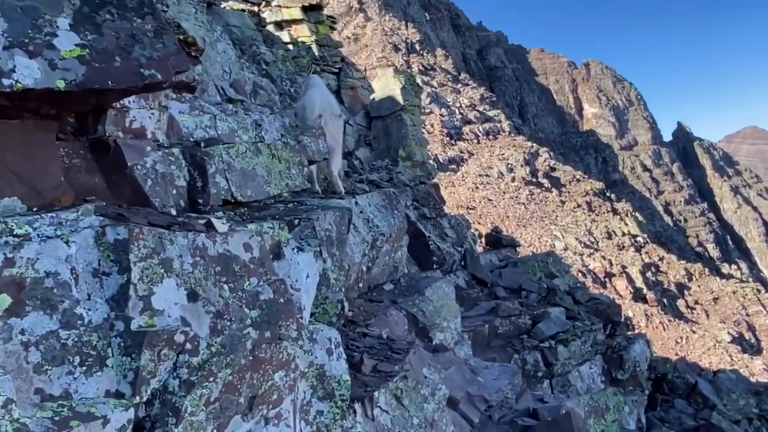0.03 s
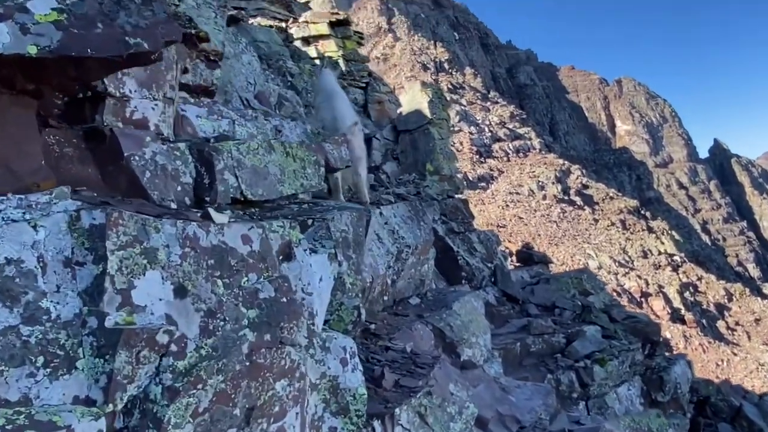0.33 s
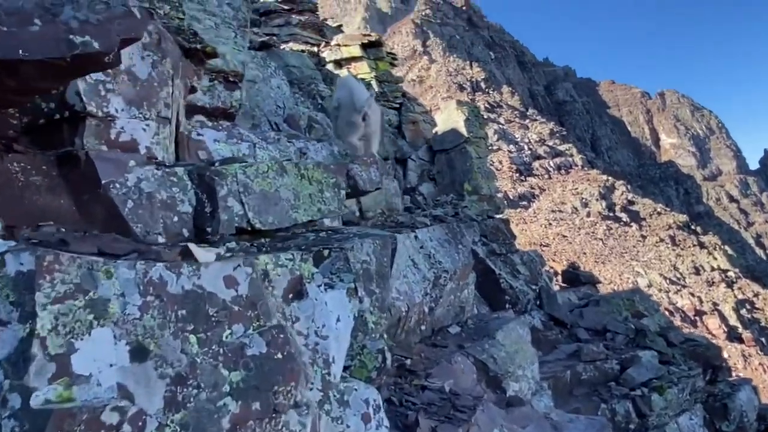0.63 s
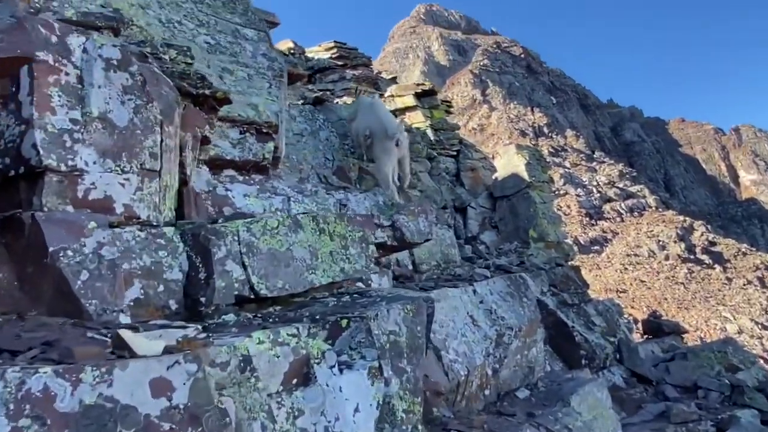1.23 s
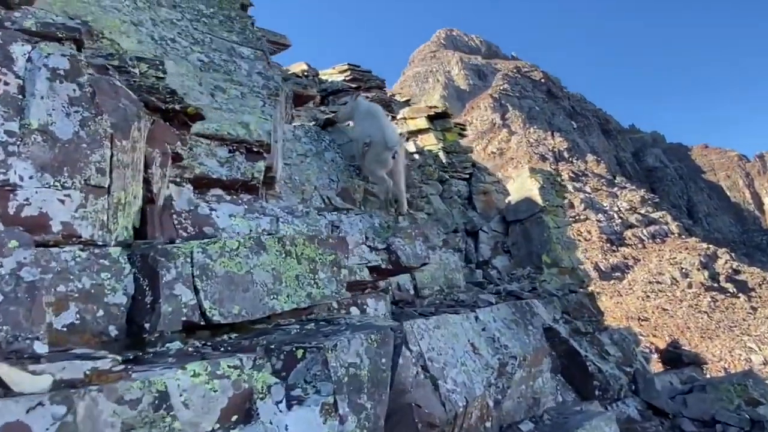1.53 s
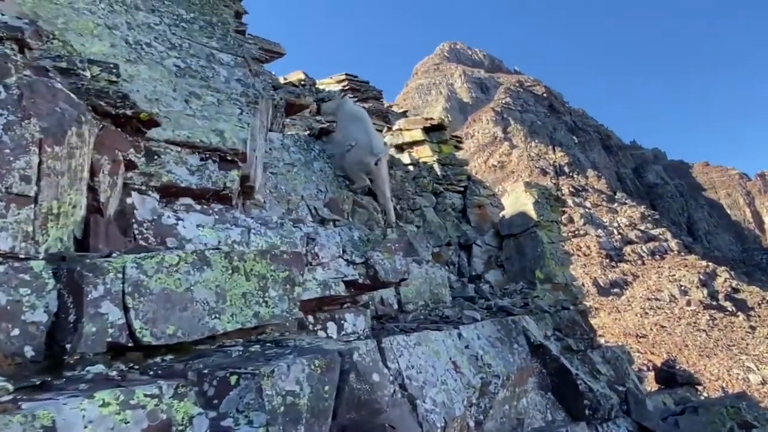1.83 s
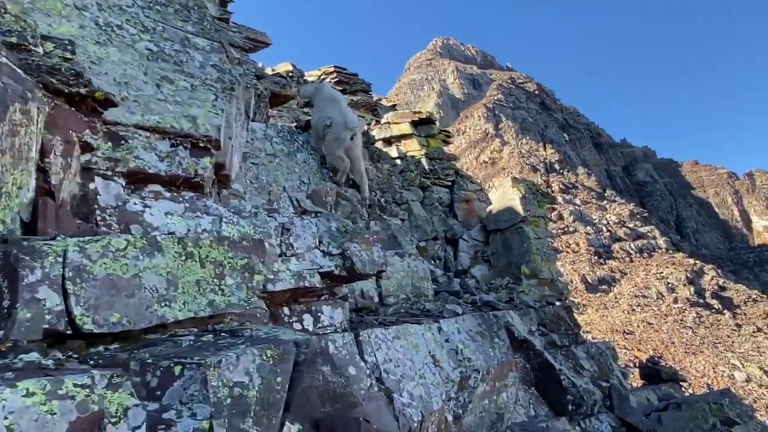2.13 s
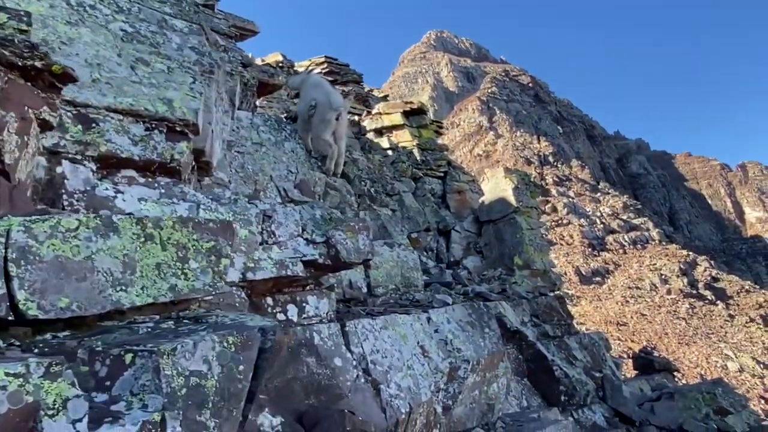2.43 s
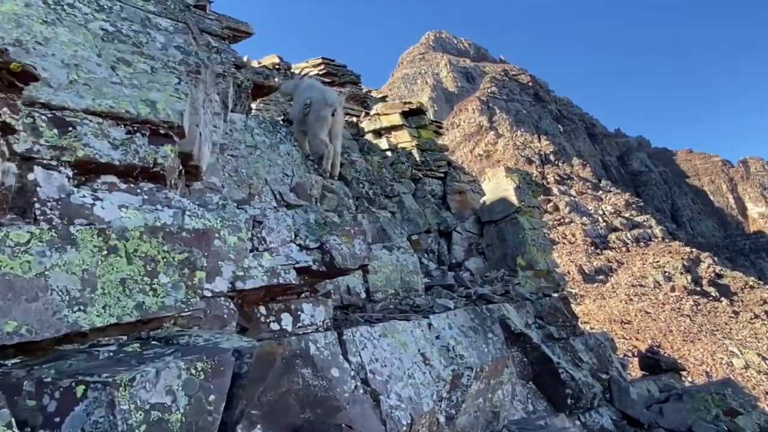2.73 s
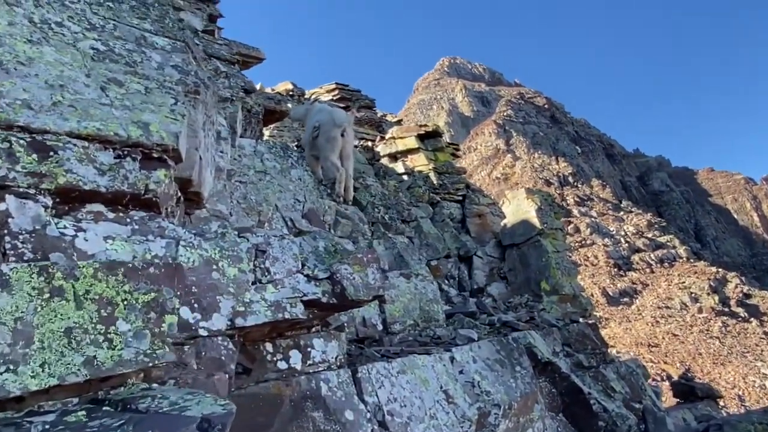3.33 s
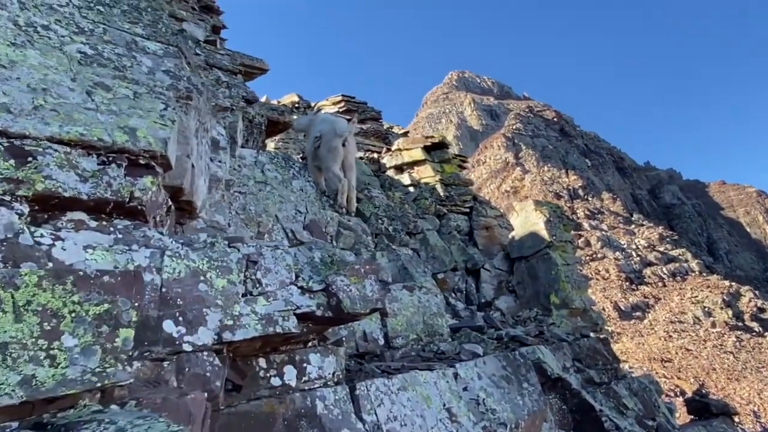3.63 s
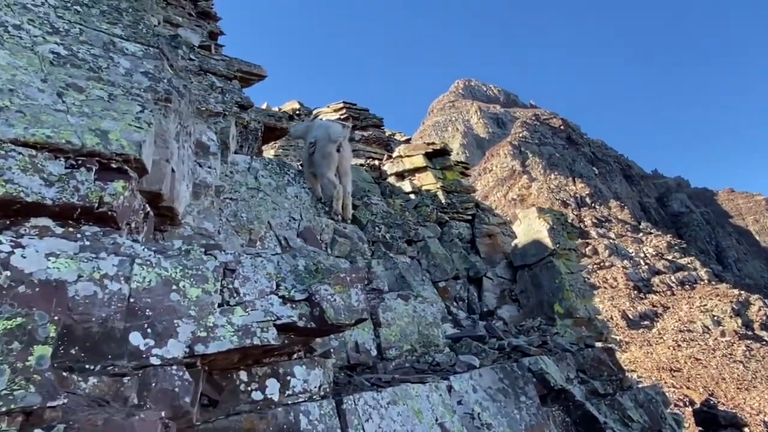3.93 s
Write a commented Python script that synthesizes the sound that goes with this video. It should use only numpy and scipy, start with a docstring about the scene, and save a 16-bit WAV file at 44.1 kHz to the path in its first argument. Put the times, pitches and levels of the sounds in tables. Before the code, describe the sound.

Gusty wind buffets the microphone over a few footsteps clacking on loose rock.

```python
"""Footsteps on a windy mountain ledge

Loose slabs clack underfoot, small chips tick and soles scuff over grit. The rock wall beside
the path answers with a short echo. Gusts hit the microphone with a low rumble and a stream of
eddies: small swirls of air, each a short falling flutter, the strongest heard as separate puffs.
Behind it all is the faint hiss of open air."""
import sys
import numpy as np
from scipy import signal
from scipy.fft import rfft, irfft, next_fast_len
from scipy.io import wavfile
from scipy.ndimage import map_coordinates

SR = 44100
rng = np.random.default_rng(int(sys.argv[2]) if len(sys.argv) > 2 else 0)


def digitize_waveform(pressure):
    """Quantize a signal to 16-bit integers and store it at the path in sys.argv[1].

    Rows of a 2-D input are taken as channels; values are limited to [-1, 1].
    """
    field = np.atleast_2d(pressure).T
    bounded = np.clip(field, -1, 1)
    quanta = np.round(bounded * 32767).astype(np.int16)
    wavfile.write(sys.argv[1], SR, quanta)


N = 176400  # 4 seconds
STEP_ALIKE = 0.24  # how alike the steps are left and right, from 0 (unrelated) to 1 (the same)

# Wind strength at the microphone. Each row: time in seconds, level in dB.
GUST_LEVEL = [(0.0, -33.5), (0.14, -32), (0.2, -43.5), (0.29, -48), (0.33, -34.5), (0.35, -50),
              (0.4, -40.5), (0.45, -58.5), (0.48, -37), (0.52, -53.5), (0.61, -43), (0.65, -71), (0.7, -49),
              (0.72, -67), (0.74, -41.5), (0.78, -46.0), (0.84, -35), (0.88, -42.0), (1.0, -43.5),
              (1.05, -32), (1.08, -37.5), (1.16, -32), (1.21, -34), (1.32, -35.5), (1.34, -45.5),
              (1.42, -29.5), (1.48, -34), (1.95, -28.5), (2.16, -35), (2.19, -32.5), (2.21, -30.5),
              (2.28, -35), (2.31, -36.5), (2.35, -27), (2.39, -39), (2.46, -31.5), (2.49, -46.5),
              (2.55, -31), (2.59, -45.5), (2.63, -22), (2.66, -36.5), (2.69, -53), (2.72, -63), (2.74, -34),
              (2.92, -26.5), (2.99, -32.5), (3.01, -29), (3.32, -33), (3.34, -40), (3.39, -31.0),
              (3.41, -39), (3.51, -31.5), (3.59, -66), (3.61, -42.0), (3.7, -49.5), (3.72, -44.5),
              (3.76, -63.5), (3.78, -40.5), (3.81, -57.5), (3.88, -39.5), (3.91, -74), (3.99, -64)]


def amp(db):
    """Turn decibels into a number to multiply a sound by."""
    return 10 ** (np.asarray(db) / 20)


def unit(x):
    """Scale a signal so its average strength (rms) is 1."""
    return x / np.sqrt(np.mean(x ** 2) + 1e-20)


def along(points, hz):
    """Read between (Hz, value) points, giving each octave equal room."""
    freqs, values = np.transpose(points)
    return np.interp(np.log(hz + 1), np.log(freqs + 1), values)


def curve(rows):
    """Join (seconds, value) rows with straight lines, one value per sample."""
    return np.interp(np.arange(N) / SR, *np.transpose(rows))


def wobble(per_s, size=N):
    """A smooth curve through per_s random values a second."""
    return map_coordinates(rng.standard_normal(8192), [np.arange(size) * per_s / SR], mode="wrap")


def filtered(x, response):
    """Multiply each frequency in x by response(hz)."""
    n = x.shape[-1]
    padded = next_fast_len(n + 4096)
    return irfft(rfft(x, padded) * response(np.fft.rfftfreq(padded, 1 / SR)), padded)[..., :n]


def pan(db):
    """Gains that turn the left side up by db and the right side down as much."""
    return amp(np.array([[db], [-db]]))


def noise(spectrum, alike, tilt_db=0, size=N):
    """Stereo noise shaped by a spectrum, gaining tilt_db for each octave above 500 Hz."""
    def colour(hz):
        width = np.arccos(np.clip(along(alike, hz), -1, 1)) / 2
        octaves = np.log2(np.maximum(hz, 500) / 500)
        return amp(along(spectrum, hz) + tilt_db * octaves) * [np.cos(width), np.sin(width)]
    mid, side = filtered(rng.standard_normal((2, size)), colour)
    return unit(np.array([mid + side, mid - side]))


def add(out, start, x):
    """Mix x into out, beginning at start seconds."""
    i = int(np.clip(round(start * SR), 0, N - 1))
    out[:, i:i + x.shape[-1]] += x[..., :N - i]


def wind():
    """Gusts hit the microphone: a deep rumble, lumpy buffeting and a quicker, higher flutter."""
    # How loud the rumble and flutter are. Each row: time in seconds, level in dB.
    rumble_level = [(0.0, -29), (0.18, -35), (0.2, -44), (0.45, -31.0), (0.52, -49.5), (0.62, -30.5),
                    (0.65, -50), (0.76, -38.5), (0.78, -49.5), (0.86, -40.5), (1.05, -39.5), (1.13, -31),
                    (1.35, -36), (1.57, -26.5), (1.6, -34.0), (1.72, -26.5), (1.97, -37), (2.06, -31),
                    (2.16, -35), (2.18, -37), (2.34, -28), (2.39, -41), (2.42, -28.5), (2.49, -32.5),
                    (2.58, -29.5), (2.71, -40.5), (2.79, -25.5), (2.82, -35), (2.86, -28.5), (3.06, -29.5),
                    (3.1, -25.5), (3.15, -33.5), (3.22, -22.5), (3.25, -36.5), (3.49, -27), (3.52, -37),
                    (3.83, -38.5), (3.87, -31.5), (3.92, -47), (3.99, -45)]
    flutter_level = [(0.0, -34), (0.14, -36.5), (0.17, -64), (0.33, -44), (0.45, -60), (0.48, -55.5),
                     (0.52, -70), (0.61, -50.0), (0.63, -68.5), (0.77, -57.5), (0.78, -66.5), (0.83, -48),
                     (0.88, -49), (0.92, -55), (0.94, -57.5), (1.2, -32.5), (1.24, -54), (1.28, -55),
                     (1.33, -73.5), (1.42, -39), (1.48, -45), (1.54, -32), (1.6, -41), (1.64, -30),
                     (1.69, -43.0), (1.83, -28), (1.84, -46), (1.88, -30), (1.97, -46.5), (2.07, -38.5),
                     (2.11, -52), (2.13, -54), (2.15, -68), (2.29, -33), (2.52, -61), (2.57, -38),
                     (2.6, -61), (2.62, -30), (2.65, -28.5), (2.67, -69), (2.72, -90.5), (2.74, -40.5),
                     (3.01, -32.5), (3.21, -35.5), (3.29, -39.5), (3.31, -40.5), (3.41, -57.5), (3.47, -36),
                     (3.55, -74), (3.64, -64), (3.76, -83), (3.78, -61.5), (3.82, -87), (3.87, -49),
                     (3.9, -82), (3.99, -76)]
    # The tone of each layer. Each row: frequency in Hz, level in dB.
    rumble_tone = [(18, -28.5), (30, -10.5), (38, -8), (50, 1.5), (68, 2.5), (105, -0.5), (160, -6),
                   (260, -37.5), (500, -78), (1200, -120)]
    buffet_tone = [(50, -20.5), (110, -3), (170, -0.5), (310, -3), (450, -8.5), (650, -32), (1000, -46),
                   (2000, -85.5), (4000, -120)]
    flutter_tone = [(200, -23), (400, -0.5), (600, -1), (850, -14), (1200, -29), (1550, -43), (2100, -58.5),
                    (4000, -84.5), (7000, -120)]
    # How alike the wind is left and right. Each row: frequency in Hz, likeness from 0 to 1.
    alike = [(50, 0.86), (250, 0.76), (600, 0), (1500, 1)]
    rumble = amp(curve(rumble_level)) * noise(rumble_tone, alike)
    lumps = amp(4 * wobble(per_s=110))
    buffet = amp(curve(GUST_LEVEL)) * unit(lumps * noise(buffet_tone, alike))
    flicker = amp(5.5 * wobble(per_s=130))
    flutter = amp(curve(flutter_level) - 4.5) * unit(flicker * noise(flutter_tone, alike))
    return pan(db=-.2) * rumble + pan(db=.2) * buffet + pan(db=3.5) * flutter


def eddy(hz, cycles, phases):
    """One swirl crosses the microphone, falling in pitch. Fewer cycles make a sharper puff."""
    t = np.arange(int(.085 * SR)) / SR
    age = t * hz / cycles / 1.653  # the puff peaks at age 1
    swell = age ** 4 * np.exp(4 * (1 - age))
    falling_tone = np.sin(2 * np.pi * cycles * 3 * np.log1p(age / 2) + phases[:, None])
    return pan(db=1.32 * np.log2(hz / 210)) * swell * falling_tone  # higher ones sit further left


def eddies():
    """A random stream of swirls, louder and higher in gusts, plus strong single puffs and one knock shaped like
    them."""
    # Single puffs, plus one knock underfoot at 3.07 s that takes the same falling shape. Each row: start in
    # seconds, peak in dB, rough starting pitch in Hz, length in cycles.
    puffs = [(.058, -33.5, 660, 2.3), (.084, -25.5, 1190, 1.1), (0.131, -20.5, 330, 1),
             (.130, -27.5, 1200, 1.3), (0.397, -28, 440, 0.81), (.609, -25.5, 530, 0.78),
             (0.836, -31, 524, 1.86), (.924, -26.5, 636, 1.26), (1.142, -25.5, 870, 1.5),
             (1.161, -27.5, 1145, 2.55), (1.204, -22, 148, 1.2), (1.278, -17, 760, 0.97),
             (1.405, -25.5, 230, 0.96), (1.42, -19, 750, 1.12), (1.547, -24, 906, 0.98),
             (1.622, -24.5, 355, 0.77), (1.638, -23, 940, 1.65), (1.771, -24, 720, 1.22),
             (1.787, -10.5, 580, .7), (1.814, -16.5, 184, 1.67), (1.816, -22.5, 1176, 1.85),
             (1.826, -39, 1160, 1), (1.829, -22, 602, 1.76), (1.836, -19.5, 173.5, 1.5),
             (1.876, -19.5, 560, 1.2), (1.881, -19.5, 149, 1.4), (1.921, -17.5, 454, 0.88),
             (2.016, -27.5, 770, 0.95), (2.073, -40, 1190, 0.87), (2.273, -17.5, 626, 1.55),
             (2.289, -22.5, 790, 1.55), (2.293, -17, 525, 1.1), (2.303, -18.5, 310, 0.88),
             (2.329, -21.5, 380, 0.69), (2.352, -27, 844, 1.4), (2.571, -20.5, 600, 1),
             (2.622, -25, 458, 0.48), (2.633, -26, 700, 0.98), (2.636, -30, 1200, 0.96),
             (2.644, -19, 178.4, 1.2), (2.646, -22.5, 880, 1.15), (2.748, -28, 690, 1.6),
             (2.755, -18, 388, 2), (2.79, -15, 408, 1.47), (2.798, -20.5, 157, 1.6),
             (2.817, -27.5, 263, 1.06), (2.835, -35.5, 1180, 1.4), (2.855, -19.5, 813, 1.4),
             (2.894, -23.5, 1225, 1.37), (2.906, -18.5, 546, 1.12), (2.94, -23, 870, 0.55),
             (2.963, -19, 615, 0.4), (3.036, -17.5, 337, 1.4), (3.061, -36, 1590, 0.98),
             (3.0699, -26.5, 1746, 2.1), (3.072, -18.5, 462, 1.3), (3.137, -27.5, 865, 1.9),
             (3.176, -16, 152.4, 0.78), (3.211, -31.5, 1290, 1.14), (3.217, -25.5, 787, 0.62),
             (3.256, -19, 780, 1), (3.306, -22.5, 490, 1.5), (3.364, -15.5, 263, 0.53),
             (3.459, -27.5, 606, 1.17), (3.618, -34.5, 400, 1.6), (3.718, -27, 304, 1.35),
             (3.778, -40, 432, 1.8), (3.877, -31, 517, 1.56)]
    eddies_per_s, tries, typical_gust_db = 100, 1600, -30.5
    out, gust_db = np.zeros((2, N)), curve(GUST_LEVEL)
    chances, scatter = rng.random((tries, 3)), rng.standard_normal((tries, 3))
    for (when, luck, turn), (size, pitch, skew) in zip(chances, scatter):
        if luck < eddies_per_s * N / SR / tries:
            db = gust_db[int(when * N)]
            hz = 470 * np.exp(.3 * pitch + .013 * (db - typical_gust_db))
            gain = amp(db - 6 + 10 * min(size, 1.5))
            phases = 2 * np.pi * turn + .28 * np.array([skew, -skew])
            add(out, when * N / SR, gain * eddy(hz, cycles=1.176, phases=phases))
    for start, db, hz, cycles in puffs:
        phases = rng.uniform(0, 2 * np.pi) + rng.normal(0, .5, 2)
        add(out, start, amp(db) * eddy(hz, cycles, phases))
    return out


def veer(x):
    """As the wind turns, it reaches one side of the microphone a little before the other."""
    # How much sooner the wind reaches the left side. Each row: time in seconds, lead in seconds.
    left_lead = [(0, .0001), (.75, .0001), (1.25, -.0002), (1.75, .0007), (2.25, 0), (2.75, .00065),
                 (3.25, -0.00013), (3.75, .0001)]
    shift = curve(left_lead) * SR / 2
    return np.array([map_coordinates(channel, [np.arange(N) + side * shift], mode="nearest")
                     for channel, side in zip(x, (1, -1))])


def open_air():
    """The faint, gently wavering hiss of open air."""
    # How loud the hiss is. Each row: time in seconds, level in dB.
    level = [(0, -72.5), (1.25, -68), (1.5, -70.5), (2.9, -69), (3.15, -74.5), (3.8, -76), (4, -67)]
    # Its tone. Each row: frequency in Hz, level in dB.
    tone = [(100, -6), (700, 2), (1700, 5), (2200, -2.5), (3600, -4.5), (5200, -11), (6600, -11),
            (8700, -24.5), (10300, -24), (12000, -23), (13000, -33.5), (16000, -39.5)]
    return amp(curve(level) + wobble(per_s=7.6)) * noise(tone, alike=[(1000, .034)])


def whine():
    """A very faint, narrow hiss high in the treble."""
    centre_hz, width_hz = 12000, 170
    band = lambda hz: np.exp(-.5 * ((hz - centre_hz) / width_hz) ** 2)
    return amp(db=-95) * unit(filtered(rng.standard_normal((2, N)), band))


def scuffs():
    """Soles slide on rock. Each slide swells, holds and fades, roughened by grit."""
    # The slides. Each row: start in seconds, length in seconds, level in dB,
    # brightness in dB per octave, pitch of the rasp in Hz, boost of the rasp in dB.
    slides = [(0, 0.84, -69.5, -0.5, 6500, 3.5), (0.324, 0.27, -68, 0.5, 6300, 2.5),
              (0.6, 0.15, -60.5, 0.5, 5200, 8), (0.74, 0.16, -65, 0.5, 6300, -3),
              (0.872, 0.26, -63, 1.5, 5450, 4), (1.151, 0.15, -67, 2, 2520, 9),
              (1.584, 0.076, -66, -6, 2200, 11), (1.715, 0.13, -75, 5, 4800, -9),
              (2.444, 0.064, -68.5, 0, 6500, -1), (2.644, 0.051, -62, -3, 2370, 10.5),
              (2.827, 0.2, -67, 0.5, 2240, 12.5), (2.891, 0.055, -65.5, 2.5, 2430, 12.5),
              (2.966, 0.16, -66.5, 0.5, 1330, 19), (3.511, 0.16, -64, -4, 1380, 2.5)]
    # The tone of a sole rubbing rock. Each row: frequency in Hz, level in dB.
    tone = [(400, -6.5), (1200, 13), (2000, 5), (3300, 4), (5200, 2), (6600, 3), (8000, -7), (9000, -33.5),
            (10200, -9.5), (11800, -11.5), (13500, -29), (15200, -16)]
    rise_share, fall_s, rasp_octaves = .18, .025, .18
    out, t = np.zeros((2, N)), np.arange(SR * 3 // 4) / SR
    for start, length, db, tilt, rasp_hz, rasp_db in slides:
        swell = np.sqrt(np.clip(t / length / rise_share, 0, 1))
        fade = np.exp(-np.maximum(t - length + fall_s, 0) / fall_s)
        rub = noise(tone, [(1000, STEP_ALIKE)], tilt, size=len(t))
        rasp = lambda hz: amp(rasp_db * np.exp(-.5 * (np.log2((hz + 1) / rasp_hz) / rasp_octaves) ** 2))
        add(out, start, amp(db) * swell * fade * unit(filtered(rub, rasp)))
    grit = unit(amp(3.5 * wobble(per_s=450) + wobble(per_s=40)))
    return out * grit


def slab_clacks():
    """Loose slabs knock, crunch on grit and ring briefly, a little differently each time."""
    # Knocks under a foot. Each row: start in seconds, level in dB,
    # seconds to fade by 60 dB, brightness in dB per octave.
    knocks = [(.134, -52.5, 0.06, 7), (0.307, -40, 0.037, 0.5), (0.316, -41, 0.056, 11.5),
              (0.334, -34, 0.065, -2.5), (0.3455, -23.5, 0.037, 0.5), (.359, -39, 0.035, 5),
              (.371, -36, 0.042, -11), (0.396, -43, 0.06, 1), (0.417, -43.5, 0.038, 1),
              (0.437, -41.5, 0.088, 1), (0.457, -36, 0.038, -1), (0.475, -37.5, 0.032, -1.5),
              (1.181, -44.5, 0.044, 4), (1.207, -43.5, 0.027, 4), (1.266, -42.5, 0.035, 5),
              (1.290, -64, .03, 4), (1.399, -50, 0.024, 6), (1.605, -53, 0.043, -6), (1.628, -50, 0.045, 6),
              (2.331, -47.5, 0.024, -1), (2.384, -42, 0.046, -8.5), (2.615, -40.5, 0.044, -16.5),
              (2.656, -48.5, 0.047, 1.5), (2.676, -43, 0.066, 8), (2.712, -51, 0.039, 12),
              (2.723, -48.5, 0.061, 9), (3.04, -47.5, 0.03, -14), (3.071, -43, 0.056, -10.5),
              (3.396, -43, 0.039, -11.5), (3.440, -55, .03, -21), (3.511, -53, 0.046, -5),
              (3.519, -42, 0.064, 0), (3.553, -46.5, 0.02, 4), (3.569, -44.5, 0.046, 4),
              (3.594, -44, 0.05, 4), (3.626, -50, 0.037, 2.5), (3.64, -43.5, 0.039, -11),
              (3.727, -51, 0.045, 1), (3.807, -53, 0.055, -8), (3.91, -53.5, 0.066, -2.5)]
    # The tone of the sharp crack. Each row: frequency in Hz, level in dB.
    crack_tone = [(300, -25.5), (900, 6), (1500, 10.5), (2100, 3), (2700, 1.5), (4200, -5.5), (6500, -17.5),
                  (8500, -33.5), (12000, -45.5), (16000, -53)]
    # The notes a slab rings with. Each row: pitch in Hz, level in dB, seconds to fade by 60 dB.
    slab_notes = [(960, -6.5, 0.031), (1334, 2.5, 0.05), (1480, -9, .05), (1790, 4, 0.039),
                  (2270, -2.5, 0.086), (2430, -11, 0.039), (2663, -1, 0.07), (3530, -7.5, 0.075),
                  (4034, -5, 0.056), (4540, -9.5, 0.08)]
    out, t = np.zeros((2, N)), np.arange(SR // 5) / SR
    rise = 1 - np.exp(-t / .0003)
    for start, db, fade_s, tilt in knocks:
        crack = noise(crack_tone, [(1000, STEP_ALIKE)], tilt, size=len(t)) * amp(-60 * t / fade_s)
        crunch = amp(3 * wobble(per_s=600, size=len(t)))
        ring = np.zeros((2, len(t)))
        for hz, level, ring_s in slab_notes:
            note_db = level + rng.normal(0, 1.4) + tilt * np.log2(hz / 2000)
            phase = 2 * np.pi * hz * rng.normal(1, .015) * t + rng.uniform(0, 2 * np.pi, (2, 1))
            ring += amp(note_db - 60 * t / ring_s) * np.sin(phase)
        add(out, start, amp(db - 9) * rise * (crack * crunch + amp(db=-12) * ring))
    return out


def chip_ticks():
    """Small chips of stone give only a bright tick."""
    # The ticks. Each row: start in seconds, level in dB,
    # seconds to fade by 60 dB, brightness in dB per octave.
    ticks = [(.503, -43.5, 0.028, -5), (0.611, -52.5, 0.019, 6.5), (.746, -32, 0.041, -6),
             (0.919, -60.5, 0.016, 5), (1.192, -43, 0.057, 12.5), (1.716, -49.5, 0.081, 4.5),
             (1.741, -54.5, 0.032, 0), (1.828, -43.5, 0.011, 7), (2.016, -66.5, 0.12, 6),
             (2.441, -43.5, 0.058, -3)]
    # The tone of a chip. Each row: frequency in Hz, level in dB.
    tone = [(500, -7.5), (1500, -5), (3500, -0.5), (5800, 5.5), (8000, 2), (9000, -13), (11500, 3),
            (13500, -26.5), (15500, -7.5)]
    out, t = np.zeros((2, N)), np.arange(SR // 5) / SR
    rise = 1 - np.exp(-t / .0013)
    for start, db, fade_s, tilt in ticks:
        burst = noise(tone, [(1000, STEP_ALIKE)], tilt, size=len(t))
        add(out, start, amp(db - 4.5 - 60 * t / fade_s) * rise * burst)
    return out


def wall_echo(x):
    """The rock face scatters sound back as a short echo."""
    delay_s, fade_s = .005, .06
    t = np.arange(SR // 3) / SR
    tail = rng.standard_normal((2, len(t))) * amp(-60 * t / fade_s) * (t > delay_s)
    return signal.fftconvolve(x, tail / np.linalg.norm(tail[0]), axes=1)[:, :N]


def scene():
    """Mix the steps, their echo, the wind and the faint hisses."""
    steps = pan(db=-1.5) * (slab_clacks() + chip_ticks() + scuffs())
    air = open_air()
    return steps + amp(db=-8) * wall_echo(steps) + veer(wind() + eddies()) + air + whine()


def record(dry):
    """Cut away the very highest treble."""
    return filtered(dry, lambda hz: hz < 15850)


dry = scene()
out = record(dry)
digitize_waveform(out)
```